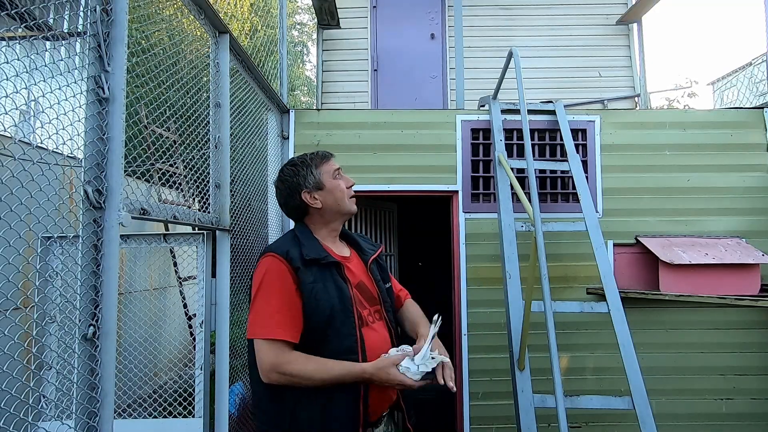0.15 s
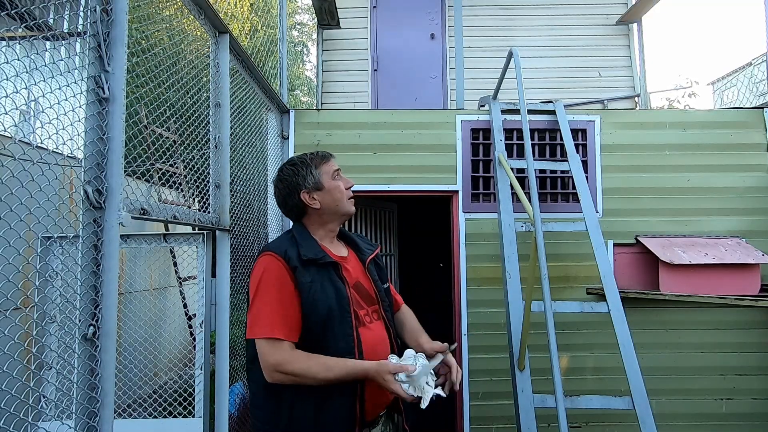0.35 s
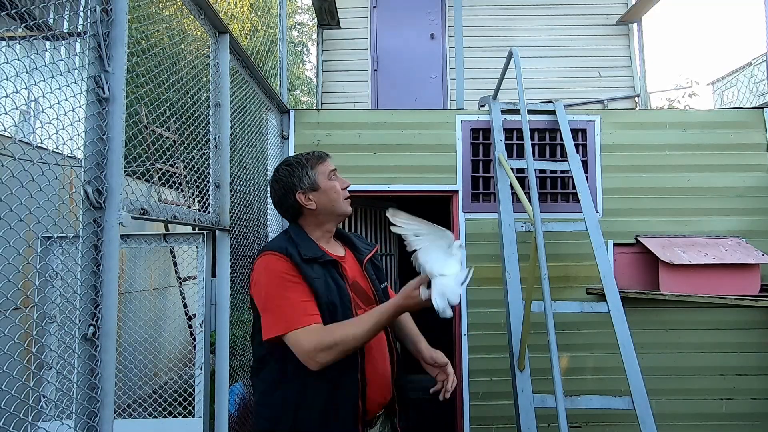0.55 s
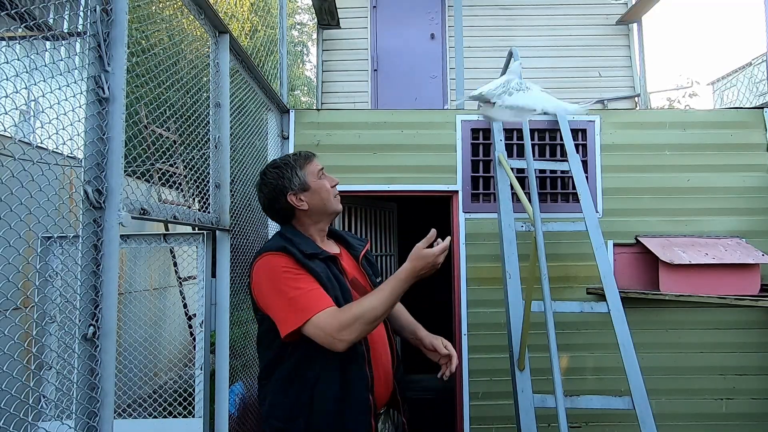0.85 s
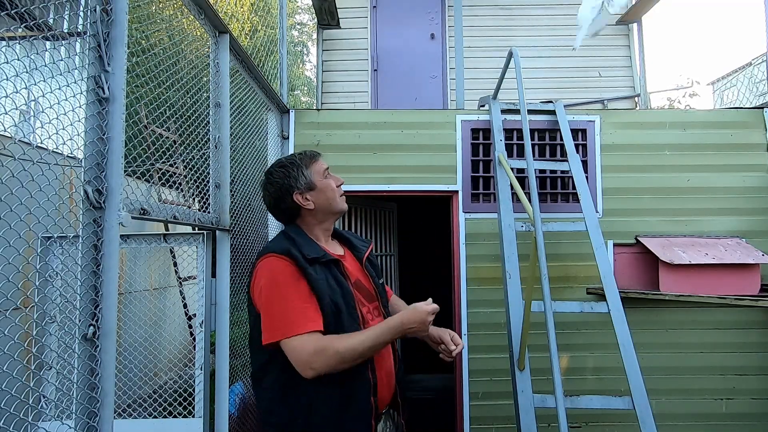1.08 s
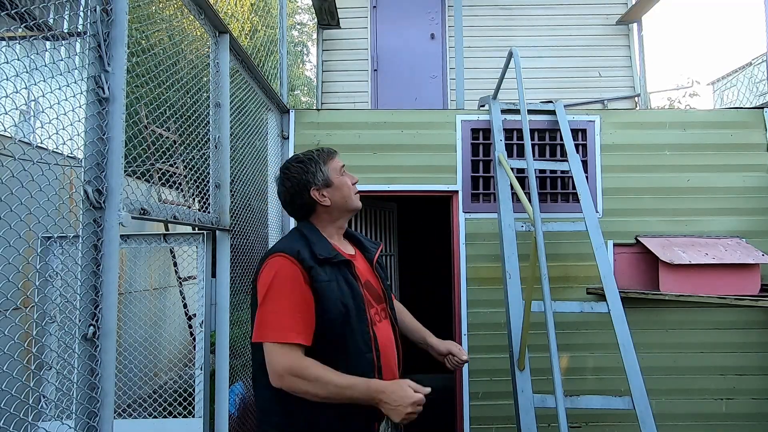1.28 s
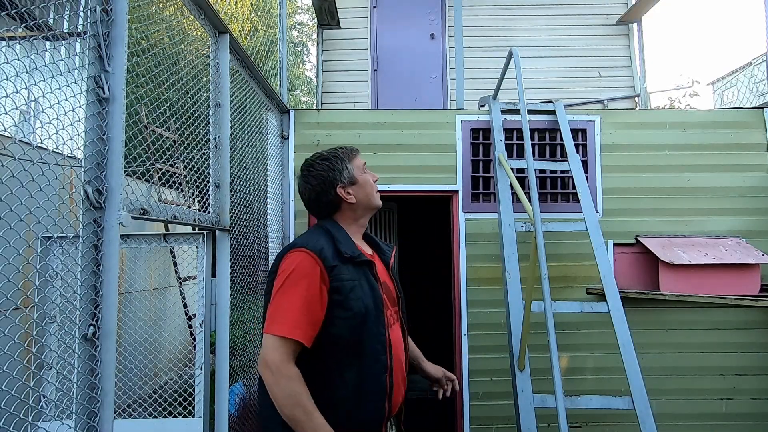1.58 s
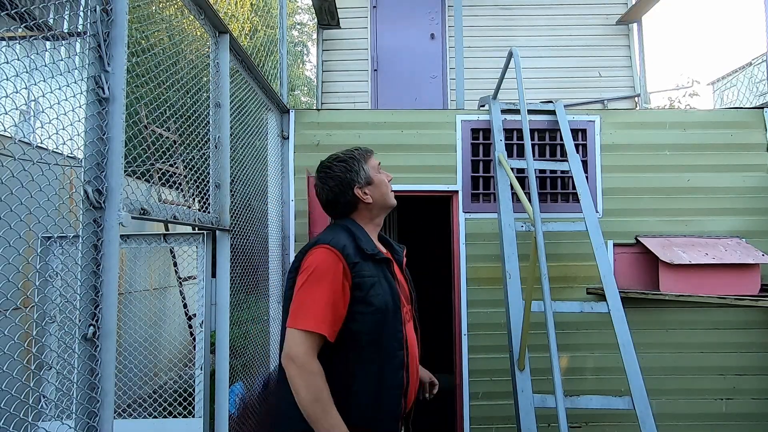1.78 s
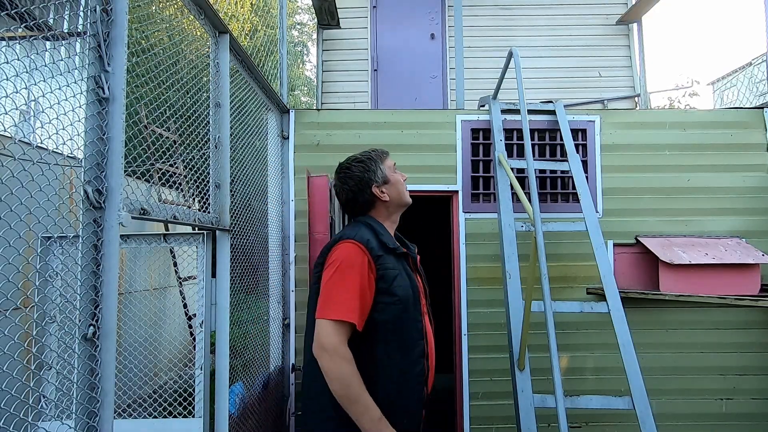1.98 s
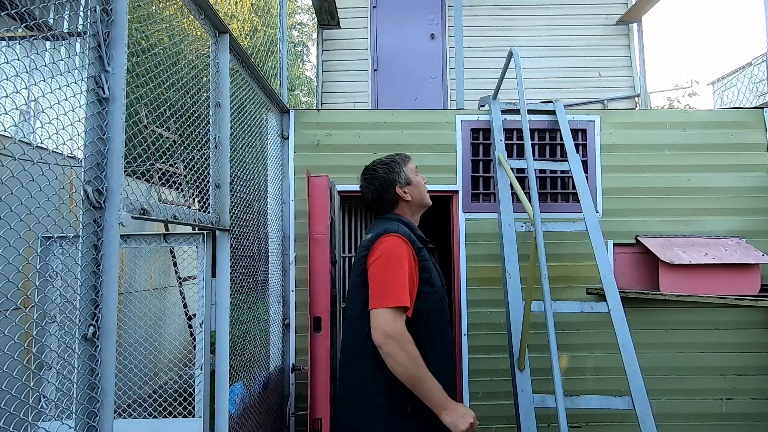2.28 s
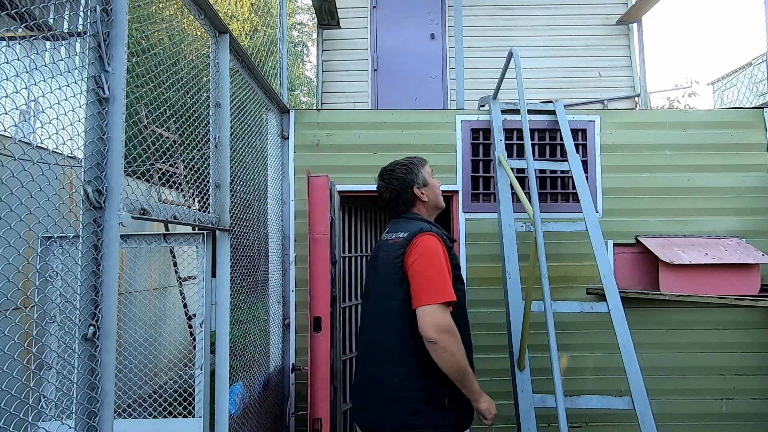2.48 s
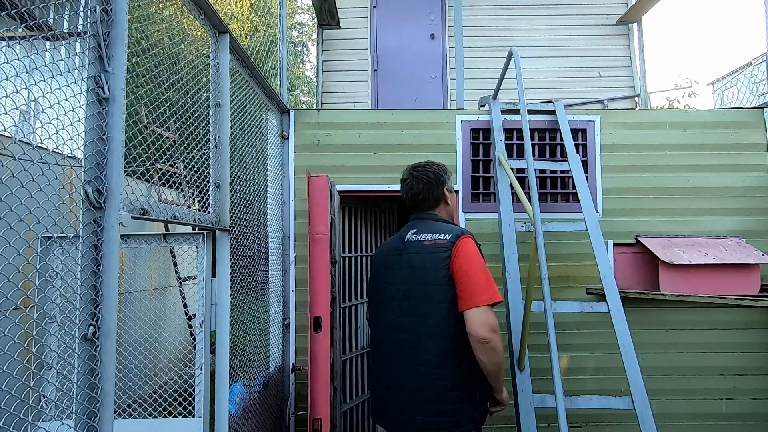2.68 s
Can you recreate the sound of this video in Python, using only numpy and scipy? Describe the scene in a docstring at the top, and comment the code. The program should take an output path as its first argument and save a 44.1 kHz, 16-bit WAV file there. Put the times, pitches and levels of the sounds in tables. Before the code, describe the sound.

A pigeon takes off in a small hard-walled yard. Faint air and feather rustle come first; from 0.22 seconds, crisp wing claps snap about seven times a second, each slightly different, with a short boxy echo. Low whooshes and air puffs are strongest around 0.85-1.45. Claps generally weaken from 1.5, drifting slightly left to right, ending near 2.57. Faint swishes, a tiny bright tick at 2.78, and quiet air remain.

```python
"""Pigeon clapping up out of a yard

A pigeon is tossed up in a small yard between sheds and climbs away, clapping about seven times a second.
Each clap is a pulse, a burst of decaying noise and a short thump, thrown back by the walls as shaped noise.
Between claps the feathers swish in grainy noise, whirr in gliding narrow bands, and tick once near the end.
Strokes passing the microphone whoosh and push low puffs of air at it, over the quiet noise of the yard."""
import sys
import numpy as np
from scipy import signal
from scipy.fft import rfft, irfft
from scipy.io import wavfile
from scipy.ndimage import uniform_filter1d

SR = 44100
rng = np.random.default_rng(int(sys.argv[2]) if len(sys.argv) > 2 else 0)


def to_wav(s):
    """Save 16-bit WAV."""
    ch = np.atleast_2d(s).T  # columns
    pcm = np.round(np.clip(ch, -1, 1) * 32767)  # PCM
    wavfile.write(sys.argv[1], SR, pcm.astype(np.int16))


N = 125685
T = np.arange(N) / SR  # time in seconds

CLAP_SIZE = 32768  # samples given to one clap and its echo
CLAP_T = np.arange(CLAP_SIZE) / SR
TREBLE_HZ = 3470  # the treble of each clap is set above this

# Wing claps. Each row: start in seconds, level in dB, crack in dB against the spatter,
# spatter decay time in ms, thump in dB, treble in dB, yard echo in dB.
CLAPS = [(0.2249, 3.5, -22, 3.4, -7, 1.5, -4), (.3620, 3.5, -3, 1.6, -18, -4.5, -5),
         (.508, -2.5, -15, 1.4, -13, 0, -1.5), (0.65, 4, 0, 1.14, -11.5, -4.5, -3.5),
         (.8018, -3.5, -3, 2.5, -7.5, 4, .5), (.9390, -2.5, -1, 4.3, -14, -4.5, 2.5),
         (0.9589, 3.5, -31, 6.3, -10.5, -26, -5.5), (1.056, -4, -8, 4.8, -29, -4, 3),
         (1.0738, 7, -3, 2.9, -12, -31, -7.5), (1.1930, 1, -6, 1.1, -29, 1, -2.5),
         (1.2976, 3.5, -9, 0.71, -14.5, 0, -5), (1.4202, -3.5, 4.5, 3.3, -6, -8.5, 1.5),
         (1.4385, -0.5, -11, 5.3, -16, -3, 0.5), (1.55, -2.5, -12, 1.2, -11, 4.5, 0),
         (1.5517, -5.5, 12, 0.59, -27, 3.5, -2.5), (1.6954, -3, -15, 2.7, -11.5, -4.5, -4),
         (1.8396, -6.5, -30, 3.6, -12, -1.5, -1), (1.8510, -6, -24, 1.9, -15.5, -13, -2.5),
         (1.9865, 1, -1, 6, -15.5, -3, 0), (2.122, -2, -17, 7.7, -9, -3, -.5),
         (2.2651, -7, -13, 2.2, -12, 0.5, 3), (2.4198, -9.5, 15, 0.75, -13, 3, 2),
         (2.5723, -4, 4, 1.5, -11, -4, 0.5)]
# The bird's path across the stereo field. Each row: time in seconds, left over right in dB.
FLIGHT_PAN = [(.2, -2.5), (.7, -2.5), (1.3, 0), (2.0, 0), (2.6, 2.5)]
# Tone colour of all claps. Each row: frequency in Hz, gain in dB.
CLAP_COLOUR = [(60, -19.5), (110, -11), (160, 0), (205, -5.5), (300, -1.5), (600, -4.5), (1050, 4),
               (1500, 3), (2400, 4.5), (3300, 3.5), (4800, -1), (6500, -1.5), (8100, 3), (8900, -6),
               (9900, -7), (10500, -16), (12800, -19), (14000, -37), (16000, -67)]


def claps():
    """Wing tips meet: a crack, feather spatter and thump of air, with an echo that differs as the bird moves."""
    crack, thump = wing_crack(), air_thump()
    bands, decay = yard_bands(), yard_decay()
    out = np.zeros((2, N + CLAP_SIZE))
    for start, db, crack_db, spatter_ms, thump_db, treble_db, echo_db in CLAPS:
        bird_pan = pan(np.interp(start, *np.transpose(FLIGHT_PAN)))
        direct = unit(amp(crack_db) * crack + feather_spatter(spatter_ms)) * bird_pan
        yard = yard_echo(bands, decay) + yard_boom()
        clap = wing_resonance(direct + amp(echo_db) * yard)
        clap = clap + amp(thump_db) * thump
        clap = clap + (amp(treble_db) - 1) * cut(clap, TREBLE_HZ, "high")
        first = int(start * SR)
        out[:, first:first + CLAP_SIZE] += amp(db) * clap
    return colour(out[:, :N], CLAP_COLOUR)


SUCTION_S, SUCTION_SHARE = 0.00029, 0.16  # length and depth of the pressure dip before the crack


def wing_crack():
    """Pressure dips along a ramp, then jumps up in a one-sample pulse."""
    offset = np.arange(CLAP_SIZE) - int(SUCTION_S * SR)
    dip = SUCTION_SHARE * (offset < 0) * CLAP_T / SUCTION_S
    return unit((offset == 0) - dip)


SPATTER_LIKENESS = 0.77  # left-right correlation
SPATTER_ATTACK = 0.13  # build-up time as a share of the decay time
CRACKLE_DB, CRACKLE_STEP_S = 5, 0.00062  # single quills snap within a spatter


def feather_spatter(decay_ms):
    """Snapping quills make a noise burst that builds up fast, crackles and dies away."""
    age = CLAP_T * 1000 / decay_ms
    envelope = np.exp(-age) * (1 - np.exp(-age / SPATTER_ATTACK))
    crackle = amp(CRACKLE_DB * uneven(CLAP_T, CRACKLE_STEP_S))
    return unit(noise(CLAP_SIZE, SPATTER_LIKENESS) * envelope * crackle)


THUMP_HZ, THUMP_DECAY_S = 251, 0.0014


def air_thump():
    """Air squeezed out between the wings: a strongly damped low sine."""
    return unit(np.sin(2 * np.pi * THUMP_HZ * CLAP_T) * np.exp(-CLAP_T / THUMP_DECAY_S))


WING_RIPPLE_DB, WING_RIPPLE_HZ = 3, 75.06  # spread, and spacing in the bass; wider towards the treble


def wing_resonance(x):
    """Shallow random peaks and dips of the flexing wing, new at each clap."""
    hz = np.geomspace(100, 16000, 400)
    warped_hz = hz / (1 + hz / 12000)
    ripple_db = WING_RIPPLE_DB * uneven(warped_hz, WING_RIPPLE_HZ)
    return colour(x, np.transpose([hz, ripple_db]))


WALL_DELAY_S = 0.0048
ECHO_BUILD_UP = 1 - np.exp(-(CLAP_T / WALL_DELAY_S) ** 2)  # the walls answer after a short delay
# Echo of the yard in bands. Each row: centre in Hz, near walls in dB, their 60 dB decay in seconds,
# far tail in dB, its 60 dB decay in seconds.
YARD = [(149, 8.5, 0.11, -3, 1), (456, 6, 0.15, -0.5, 0.99), (1200, -4, .17, -2, 0.36),
        (2860, 1, 0.14, -4.5, 0.35), (7400, -0.5, 0.16, -10, 0.38)]
ECHO_LIKENESS = 0.53  # left-right correlation


def yard_bands():
    """Stereo noise split into the overlapping bands of the yard echo."""
    spectrum = rfft(noise(N, ECHO_LIKENESS))
    log_hz = np.log(np.maximum(np.arange(spectrum.shape[1]) * SR / N, 1))
    centres = np.log([row[0] for row in YARD])
    bands = []
    for share in np.eye(len(YARD)):
        bands.append(irfft(spectrum * np.interp(log_hz, centres, share), N))
    return np.array(bands)


def yard_decay():
    """Near walls die away fast and the far tail more slowly; their powers add in each band."""
    decay = []
    for _, near_db, near_t60, far_db, far_t60 in YARD:
        near = amp(near_db) * echo_fade(near_t60)
        far = amp(far_db) * echo_fade(far_t60)
        decay.append(np.hypot(near, far))
    return np.array(decay)


def echo_fade(t60):
    """Unit-energy envelope of an echo that builds up, then falls by 60 dB in t60 seconds."""
    return unit(ECHO_BUILD_UP * amp(-60 * CLAP_T / t60))


ECHO_PAN_DB = -2.5  # left over right: echo and swishes lean to the right
ECHO_GRAIN_DB, ECHO_GRAIN_S = 0.5, 0.0016  # single reflections stand out
ECHO_FLUTTER_DB, ECHO_FLUTTER_S = 1.73, 0.00673  # the echo comes back in clusters


def yard_echo(bands, decay):
    """Scattered reflections: a random stretch of band noise under the yard's decay."""
    k = rng.integers(N - CLAP_SIZE)
    echo = np.einsum("bct,bt->ct", bands[:, :, k:k + CLAP_SIZE], decay) * pan(ECHO_PAN_DB)
    grain_db = ECHO_GRAIN_DB * uneven(CLAP_T, ECHO_GRAIN_S)
    flutter_db = ECHO_FLUTTER_DB * uneven(CLAP_T, ECHO_FLUTTER_S)
    return echo * amp(grain_db + flutter_db)


# Standing waves between the walls. Each row: frequency in Hz, level in dB, 60 dB decay in seconds.
YARD_MODES = [(158.9, -18, 0.27), (234, -15, 0.27), (303, -24.5, 0.23)]


def yard_boom():
    """Standing waves ring between the walls as decaying sines of random phase."""
    boom = 0
    for hz, db, t60 in YARD_MODES:
        ring = np.sin(2 * np.pi * (hz * CLAP_T + rng.random()))
        boom = boom + amp(db) * unit(ECHO_BUILD_UP * amp(-60 * CLAP_T / t60) * ring)
    return boom


SWISH_RISE_S = 0.0047
CATCH_DB, CATCH_STEP_S = 1, 0.005  # feathers catch in clusters
# Feather swishes and rustles. Each row: peak in seconds, level in dB, decay in seconds.
SWISHES = [(.004, -49.5, 0.023), (0.18, -42.5, 0.049), (0.217, -41, 0.006), (.345, -49, 0.035),
           (.61, -51.5, 0.074), (0.753, -49, 0.041), (.79, -47, 0.074), (0.896, -40, 0.016),
           (0.934, -42, .015), (1.005, -43, 0.21), (1.135, -52.5, 0.023), (1.187, -33, .0094),
           (1.278, -41, 0.084), (1.541, -42.5, 0.013), (1.836, -47, .01), (1.935, -42, 0.036),
           (2.067, -44.5, 0.063), (2.222, -53, 0.038), (2.531, -61, 0.044), (2.684, -53.5, 0.021),
           (2.829, -54.5, 0.013)]
# Tone colour of the swishes. Each row: frequency in Hz, gain in dB.
SWISH_COLOUR = [(100, -38), (200, 7), (600, 4.5), (1400, 4), (3000, 2.5), (5000, -4), (8100, -5),
                (10500, -13.5), (15000, -30)]


def swishes(grain_db=3, grain_s=.001):
    """Feathers slide over each other in tiny catches: noise with a random grain."""
    level = sum(amp(db) * swell(s, SWISH_RISE_S, fall) for s, db, fall in SWISHES)
    fine_db = grain_db * np.interp(T / grain_s, np.arange(N), rng.standard_normal(N))
    catches = amp(fine_db + CATCH_DB * uneven(T, CATCH_STEP_S))
    return colour(noise(N, 0.75) * level * catches, SWISH_COLOUR) * pan(ECHO_PAN_DB)


WHOOSH_RISE_S, WHOOSH_FALL_S = 0.012, 0.022
# Whooshes of the wing strokes. Each row: peak in seconds, level in dB.
WHOOSHES = [(0.224, -39.5), (0.853, -42), (.94, -37), (1.0, -42.5), (1.057, -35.5), (1.125, -54),
            (1.181, -39), (1.285, -42), (1.428, -42), (1.46, -50), (1.51, -53), (2.119, -51)]
# Tone colour of the whooshes. Each row: frequency in Hz, gain in dB.
WHOOSH_COLOUR = [(60, -22), (110, -5), (160, 4), (210, 0), (330, 1.5), (500, -1.5), (800, -20), (2000, -27),
                 (8000, -69)]


def whooshes():
    """Low rush of air around each strong stroke: evened noise in short swells."""
    level = sum(amp(db) * swell(s, WHOOSH_RISE_S, WHOOSH_FALL_S) for s, db in WHOOSHES)
    return level * evened(colour(noise(N, 0.94), WHOOSH_COLOUR), window_s=0.011)


DRAUGHT_RISE_S, DRAUGHT_FALL_S = 0.024, 0.034
# Puffs of air on the microphone. Each row: peak in seconds, level in dB.
DRAUGHT = [(.22, -54), (.36, -53), (.54, -52), (.66, -59), (.85, -43), (0.954, -37), (1.06, -43),
           (1.125, -43), (1.265, -38), (1.435, -44), (1.72, -55.5), (1.86, -54), (1.994, -48), (2.115, -56),
           (2.221, -53), (2.36, -53)]
# Tone colour of the puffs. Each row: frequency in Hz, gain in dB.
DRAUGHT_COLOUR = [(12, -32), (25, 8.5), (37, -5), (62, -5.5), (85, -8.5), (130, -14.5), (400, -59),
                  (2000, -103)]


def draught():
    """Air pushed at the microphone rumbles in very low noise, nearly alike left and right."""
    level = sum(amp(db) * swell(s, DRAUGHT_RISE_S, DRAUGHT_FALL_S) for s, db in DRAUGHT)
    return level * evened(colour(noise(N, 0.98), DRAUGHT_COLOUR), window_s=0.12)


# Whirrs and whistles of air through the feathers. Each row: start in seconds, length in seconds,
# start frequency in Hz, end frequency in Hz, level in dB.
WHISTLES = [(0.143, 0.051, 690, 840, -54.5), (0.204, 0.052, 350, 263, -39), (1.037, 0.048, 510, 432, -40),
            (1.559, 0.03, 1000, 900, -36.5), (1.748, 0.057, 1470, 1590, -52), (2.305, 0.066, 992, 700, -49)]


def whistles(width_hz=75, tone=1.0):
    """Airy whirrs that glide: narrow bands of noise around a weak tone."""
    out = np.zeros((2, N))
    for start, length, start_hz, end_hz, db in WHISTLES:
        along = np.clip((T - start) / length, 0, 1)
        phase = 2 * np.pi * np.cumsum(start_hz + (end_hz - start_hz) * along) / SR
        sine_waver, cosine_waver = slow_noise(width_hz), slow_noise(width_hz)
        whirr = (tone + sine_waver) * np.sin(phase) + cosine_waver * np.cos(phase)
        out += amp(db) * np.sin(np.pi * along) * evened(whirr, window_s=0.0083)
    return out


def slow_noise(width_hz):
    """Low-passed noise that widens a tone into a narrow band."""
    return unit(cut(noise(N, .6), width_hz, "low", order=2)) * np.sqrt(N / 2)


TICK_S, TICK_DB, TICK_LENGTH_S = 2.782, -40, 0.0016  # peak time, level, rise and fall time
# Tone colour of the tick. Each row: frequency in Hz, gain in dB.
TICK_COLOUR = [(500, -36.5), (4000, -37), (6800, 7), (8500, 2), (10500, -5), (15000, -53)]


def tick():
    """A brief bright scratch of high noise."""
    envelope = swell(TICK_S, TICK_LENGTH_S, TICK_LENGTH_S)
    return colour(noise(N, 0.79) * amp(TICK_DB) * envelope, TICK_COLOUR)


AIR_DB, AIR_LIKENESS = -55, 0.35  # level, left-right correlation
AIR_WAVER_DB, AIR_WAVER_S = -3, 0.04
# Tone colour of the outdoor background. Each row: frequency in Hz, gain in dB.
AIR = [(30, -5), (70, -7), (110, -32), (155, 6.5), (210, -5.5), (600, -11), (1100, -7.5), (2800, -8),
       (5400, -16.5), (8100, -13.5), (10500, -25.5), (13000, -33), (15500, -49)]


def yard_air():
    """The quiet of the yard: coloured noise whose level wavers."""
    return amp(AIR_DB) * colour(noise(N, AIR_LIKENESS), AIR) * amp(AIR_WAVER_DB * uneven(T, AIR_WAVER_S))


def amp(db):
    """Decibels to gain."""
    return 10 ** (np.asarray(db) / 20)


def unit(x):
    """Scale to an energy of one per channel."""
    return x / np.sqrt(np.mean(np.sum(x ** 2, axis=-1)) + 1e-20)


def pan(db):
    """Left and right gains for a level difference."""
    return amp(np.array([[db], [-db]]) / 2)


def noise(size, likeness):
    """White stereo noise with a given left-right correlation."""
    mid, side = rng.standard_normal((2, size))
    c = np.clip(likeness, -1, 1)
    return np.sqrt((1 + c) / 2) * mid + np.sqrt((1 - c) / 2) * np.array([side, -side])


def colour(x, points, size=8192):
    """Causal (minimum-phase) filter through (Hz, dB) points; white noise keeps its power."""
    hz, db = np.transpose(points)
    grid = np.maximum(np.arange(size // 2 + 1) * SR / size, 1)
    cepstrum = irfft(np.log(amp(np.interp(np.log(grid), np.log(hz), db))))
    # folding the cepstrum forward in time gives the minimum phase
    cepstrum[1:size // 2] *= 2
    cepstrum[size // 2 + 1:] = 0
    response = unit(irfft(np.exp(rfft(cepstrum))))
    return signal.fftconvolve(x, response[None], axes=1)[:, :x.shape[1]]


def cut(x, hz, kind, order=1):
    """Butterworth filter."""
    return signal.sosfilt(signal.butter(order, hz, kind, fs=SR, output="sos"), x)


def swell(s, rise, fall):
    """A rounded rise to a peak at s, then an exponential fall."""
    return np.exp(-(np.minimum(T - s, 0) / rise) ** 2 / 2 - np.maximum(T - s, 0) / fall)


def uneven(axis, step):
    """Normal random values, one per step along an axis, joined by straight lines."""
    return np.interp(axis / step, np.arange(4096), rng.standard_normal(4096))


def evened(x, window_s):
    """Take the chance surges out of a noise, so that its envelope sets the level."""
    power = uniform_filter1d(np.mean(x ** 2, axis=0), max(int(window_s * SR), 1))
    return x / np.sqrt(power + .02)


def scene():
    """The bird over the quiet of the yard."""
    return claps() + swishes() + whooshes() + draught() + whistles() + tick() + yard_air()


TREBLE_BALANCE_HZ, TREBLE_BALANCE_DB = 6500, 1.5  # the left microphone is the brighter one
CUTOFF_HZ = 16300
# Stereo width at the microphones. Each row: frequency in Hz, gain of the side signal in dB.
STEREO_WIDTH = [(80, -2.5), (150, -7.5), (300, -10), (550, -2.5), (1100, 2.5), (2200, -1), (4500, -1),
                (8000, 3.5), (12000, 7.5)]


def record(dry):
    """Closely spaced microphones hear the low end more alike and the treble apart; the top is cut."""
    dry = dry + (pan(TREBLE_BALANCE_DB) - 1) * cut(dry, TREBLE_BALANCE_HZ, "high")
    mid, side = (dry[0] + dry[1]) / 2, (dry[0] - dry[1]) / 2
    hz, db = np.transpose(STEREO_WIDTH)
    grid = np.maximum(np.arange(N // 2 + 1) * SR / N, 1)
    width = amp(np.interp(np.log(grid), np.log(hz), db))
    side = irfft(rfft(side) * width, N)
    top_cut = signal.cheby2(12, 70, CUTOFF_HZ, fs=SR, output="sos")
    return signal.sosfilt(top_cut, np.array([mid + side, mid - side]))


dry = scene()
out = record(dry)
to_wav(out)
```